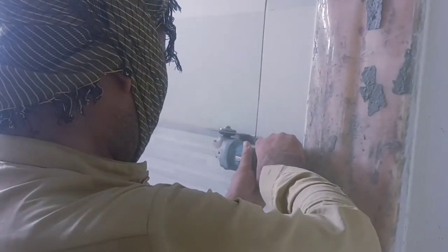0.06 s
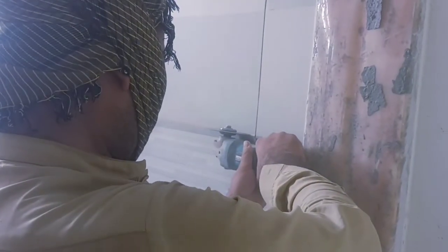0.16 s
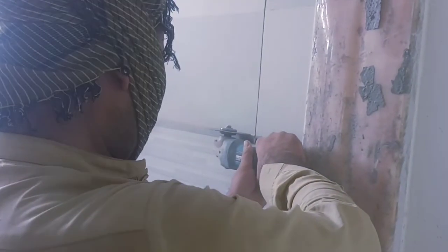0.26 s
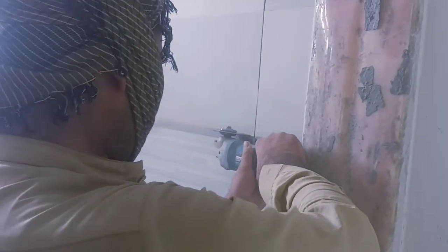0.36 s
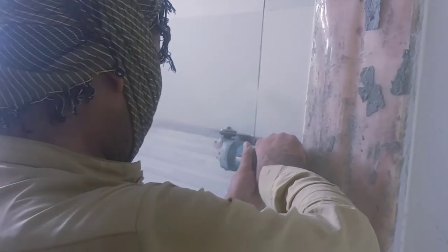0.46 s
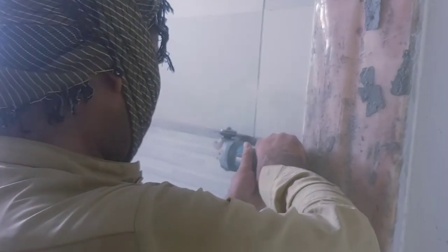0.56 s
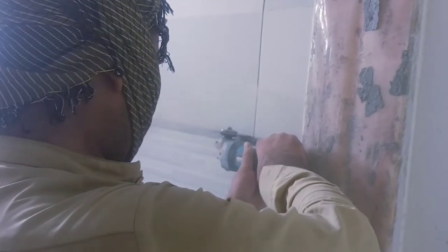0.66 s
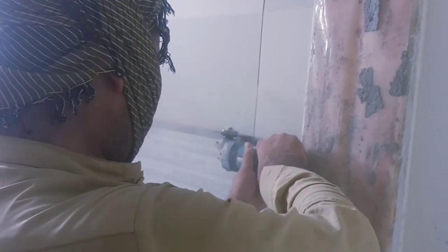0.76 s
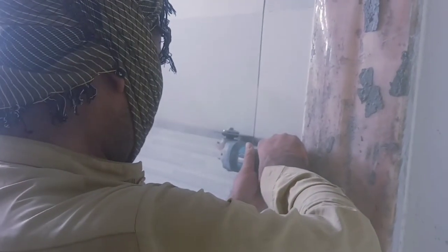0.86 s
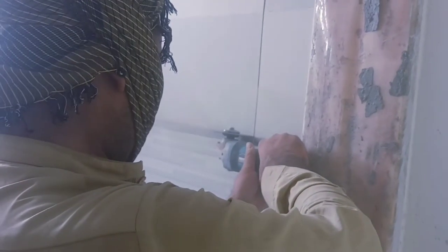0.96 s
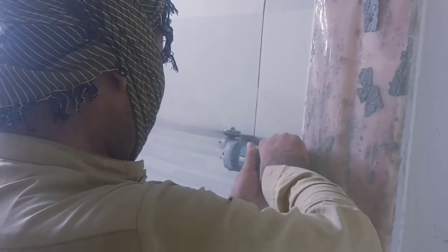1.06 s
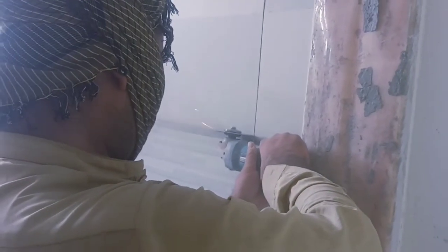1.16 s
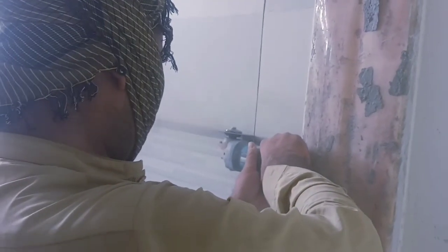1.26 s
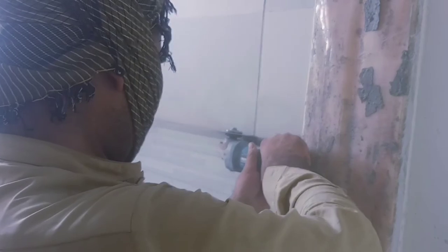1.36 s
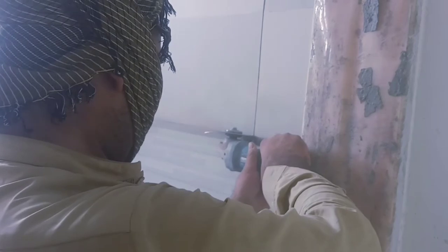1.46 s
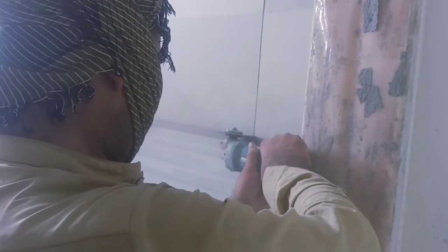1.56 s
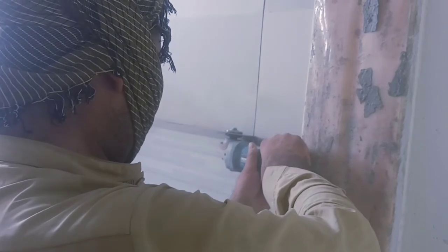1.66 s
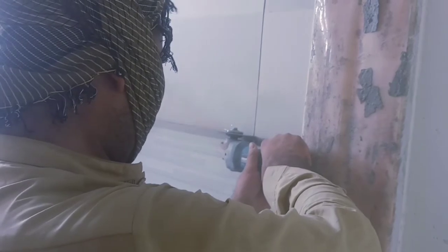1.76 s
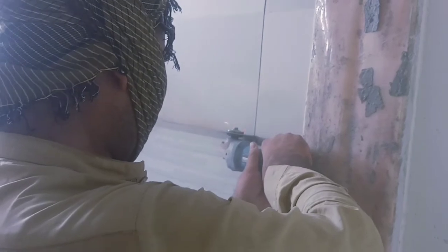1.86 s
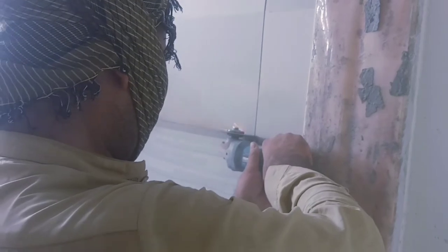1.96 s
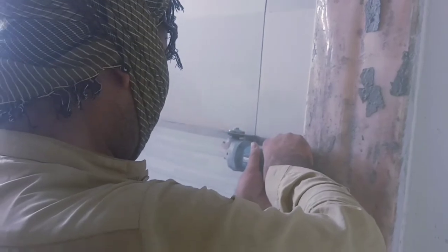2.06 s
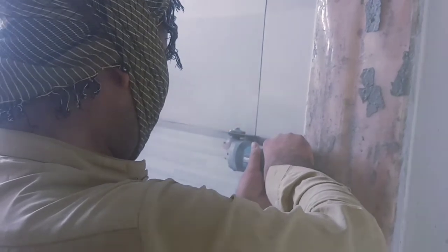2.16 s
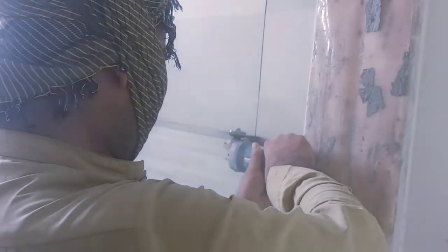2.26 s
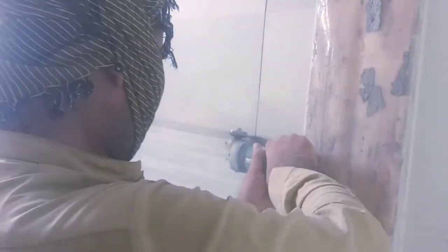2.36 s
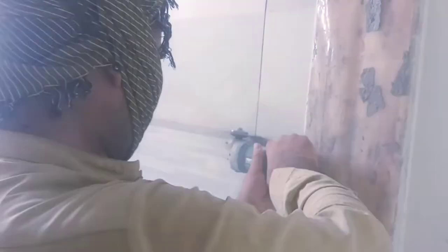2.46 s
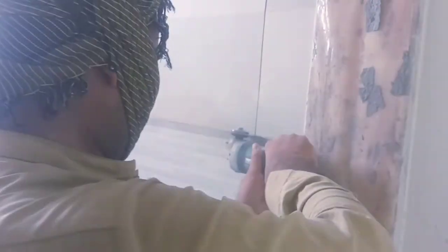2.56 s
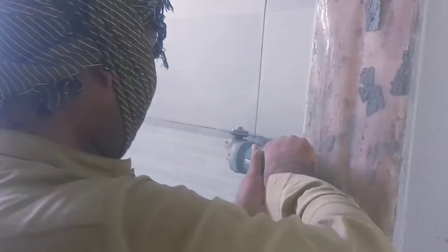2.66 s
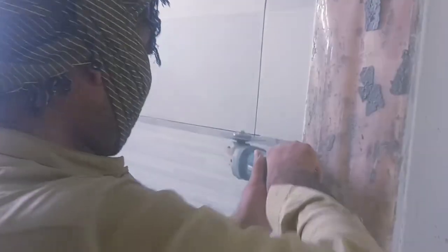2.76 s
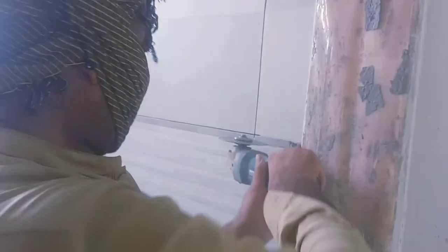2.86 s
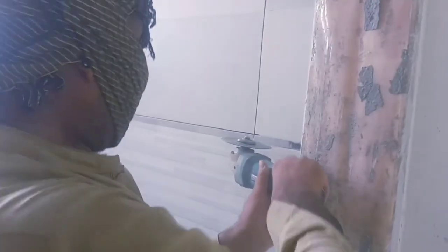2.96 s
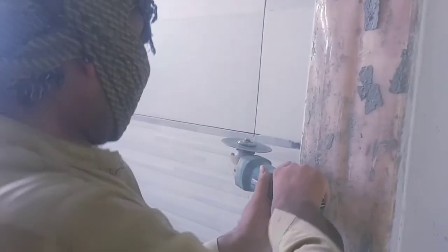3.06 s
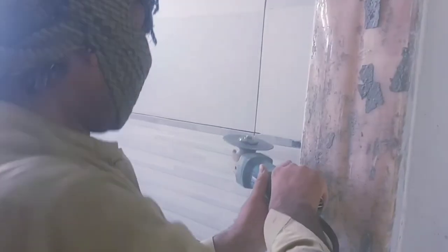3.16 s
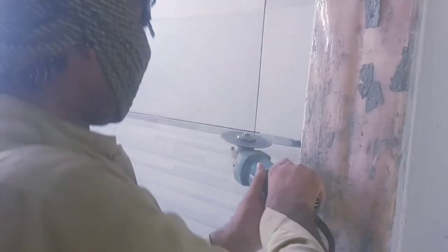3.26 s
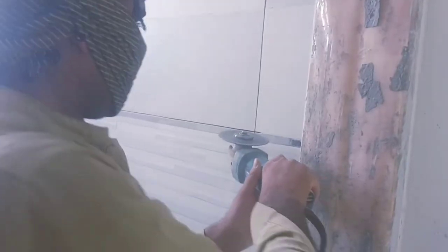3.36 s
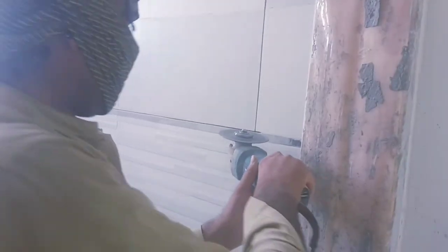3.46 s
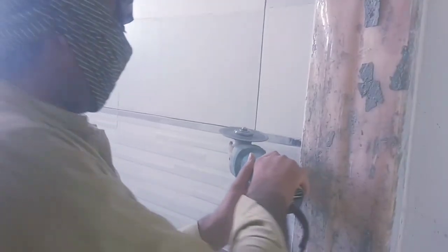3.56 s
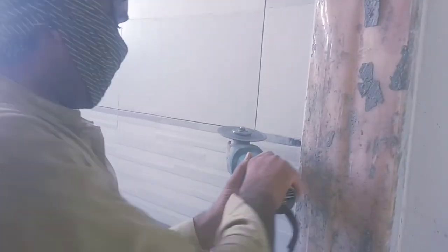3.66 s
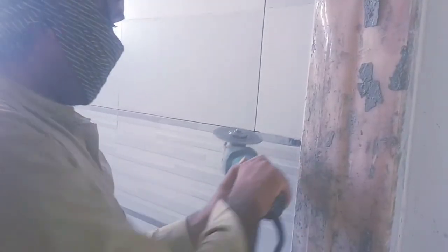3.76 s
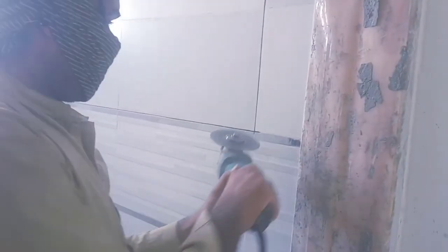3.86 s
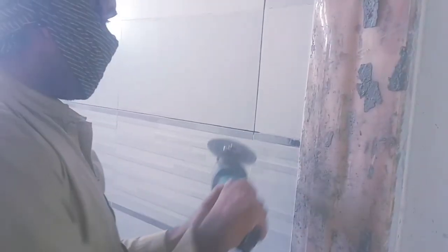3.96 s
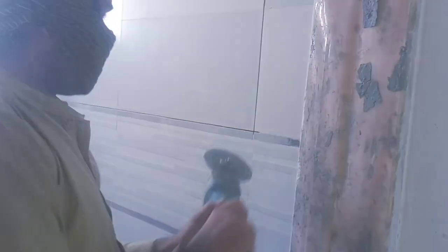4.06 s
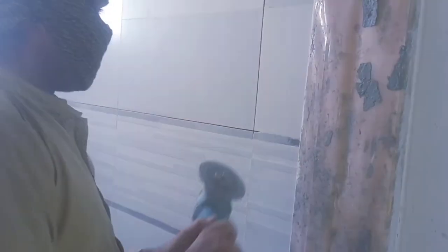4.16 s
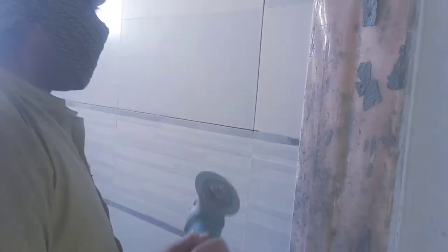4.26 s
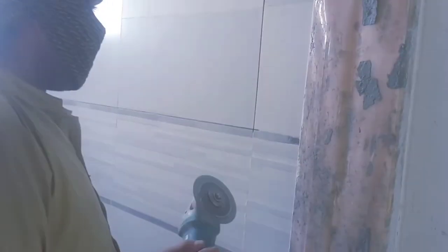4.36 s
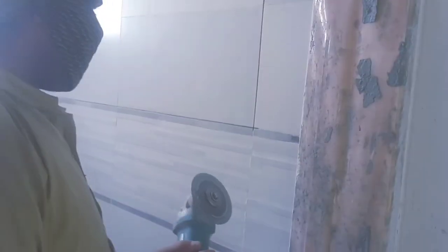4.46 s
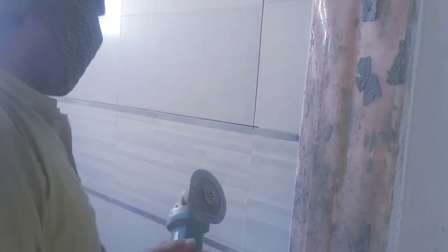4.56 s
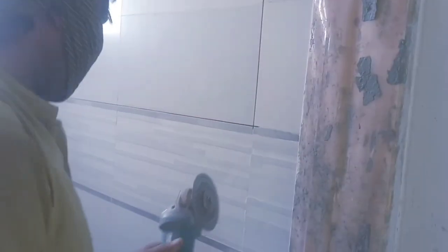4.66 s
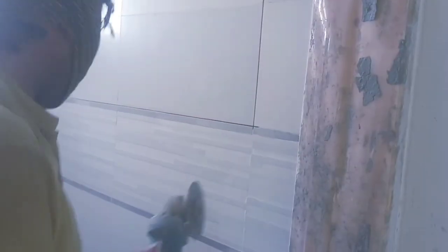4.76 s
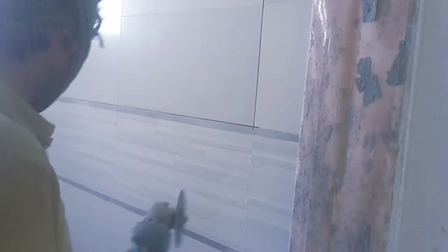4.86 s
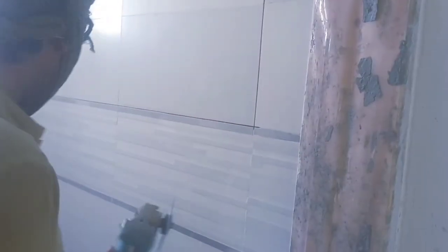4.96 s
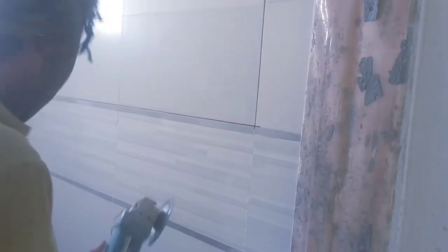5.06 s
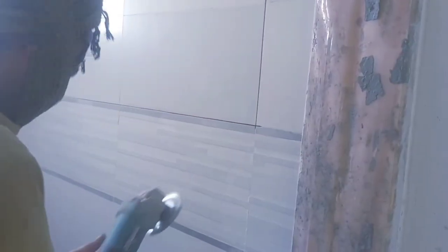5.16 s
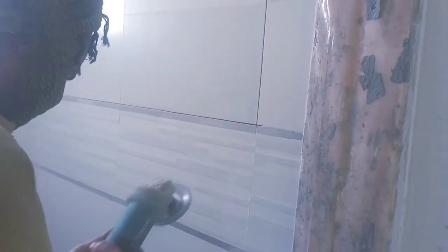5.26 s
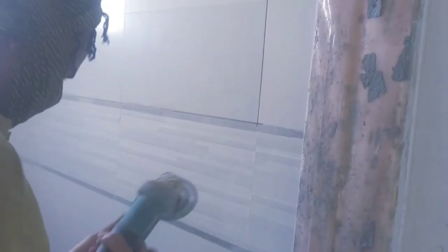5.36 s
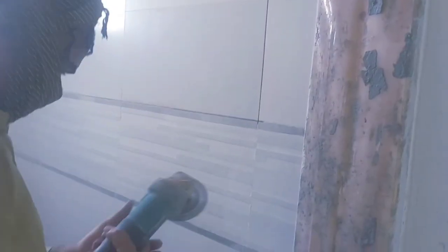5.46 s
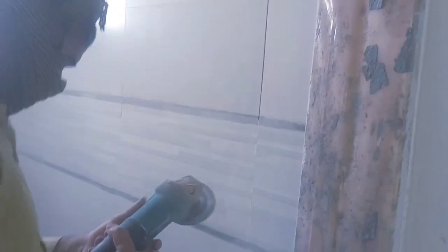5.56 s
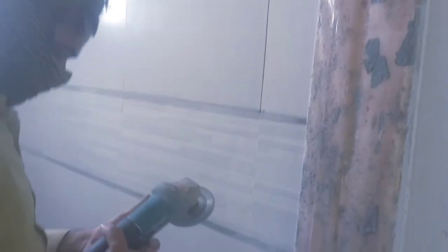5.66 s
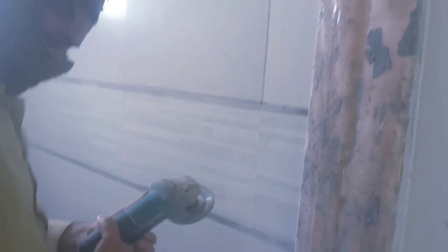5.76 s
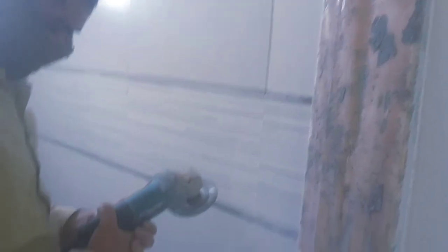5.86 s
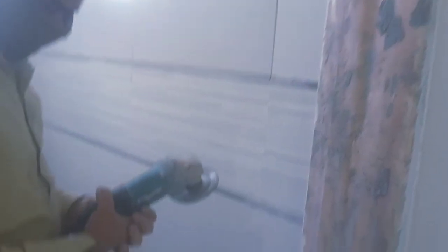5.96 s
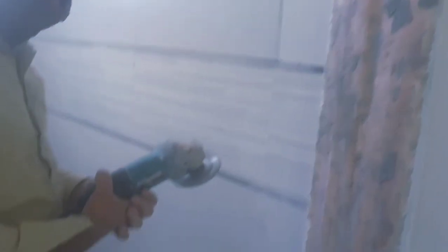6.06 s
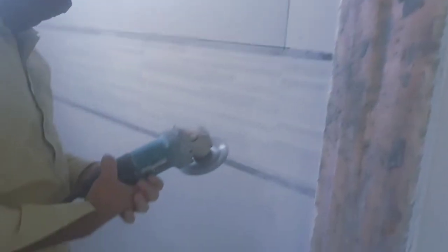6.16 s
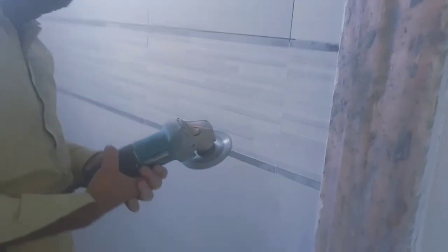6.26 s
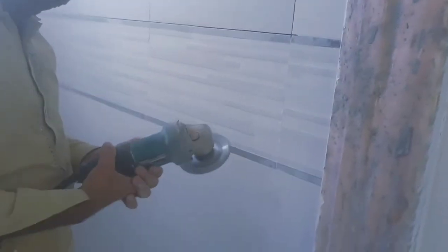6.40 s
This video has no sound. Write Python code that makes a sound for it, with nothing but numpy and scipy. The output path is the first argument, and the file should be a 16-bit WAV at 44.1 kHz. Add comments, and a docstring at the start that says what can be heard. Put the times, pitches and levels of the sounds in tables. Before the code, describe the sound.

Close in a small tiled bathroom, an angle grinder bites into wall tile with a bright, gritty rasp and wavering metallic squeals. Low wind thumps buffet the microphone, mostly on the right. After just over two seconds the rasp stops; the motor rises quickly in pitch, then runs free with a hissing air rush and high whine to the end.

```python
"""An angle grinder cuts wall tiles in a small bathroom: shaped noise is the rasp of its disc, resonators and
wavering tones are the disc's modes. The disc leaves the cut, speeds up with a rising whine and runs free while
the tool turns away from the wall; filtered noise is its air rush and a decaying sweep sets the whine.
Low turbulent noise buffets the microphone ports, mostly the right, and a faint harmonic drone lies beneath.
"""
import sys
import numpy as np
from scipy import signal
from scipy.fft import rfft, irfft, next_fast_len
from scipy.io import wavfile
from scipy.ndimage import uniform_filter1d, map_coordinates

SR = 44100
rng = np.random.default_rng(int(sys.argv[2]) if len(sys.argv) > 2 else 0)


def wav_record(signal):
    """Record a signal, one row per channel, as 16-bit PCM in the file named by sys.argv[1]."""
    frames = np.transpose(np.atleast_2d(signal))
    bounded = np.clip(frames, -1, 1)
    # unit amplitude maps onto the largest positive 16-bit level
    quanta = np.round(bounded * 32767).astype(np.int16)
    wavfile.write(sys.argv[1], SR, quanta)


N = 283563

# Rasp level, following the pressure of the disc in the cut: time_s, rasp_db
CUT_PRESSURE = [(0, -24), (0.1, -22.5), (0.6, -22.5), (1.06, -21.5), (1.9, -23.5), (2.06, -23),
                (2.12, -21.5), (2.32, -21), (2.36, -30), (2.42, -33.5)]
# Relative spectrum of the rasp: frequency_hz, density_db_per_hz
RASP_SPECTRUM = [(290, -42), (500, -15.5), (2080, -7), (2550, -8), (2860, -4), (3120, -4), (4610, -0.5),
                 (5800, -4.5), (6330, -13), (6900, -7), (7310, -15.5), (7740, -6), (10300, 3),
                 (12600, -5.5), (15700, -14)]
# Balance of the rasp between the ports: frequency_hz, left_minus_right_db
RASP_BALANCE = [(60, -5.5), (130, -7.5), (290, -7), (640, 1.5), (1410, 0.5), (3100, -4), (6820, 4.5),
                (15000, -7.5)]
# Disc modes that the grit keeps ringing: frequency_hz, width_hz, relative_level_db
DISC_MODES = [(1780, 63, -18.5), (2140, 42, -12.5), (3446, 79, -7), (3666, 54, -5), (4000, 45, -8.5),
              (4346, 69, -6), (4560, 50, -5), (5920, 80, -13), (7940, 85, -14), (8310, 75, -15),
              (8760, 66, -10), (9300, 80, -11), (10360, 63, -7.5), (10640, 70, -4), (14400, 80, -11),
              (14880, 110, -10), (15520, 100, -8)]
# Loud modes that sing all through the cut, level as at its start:
# first_hz, last_hz, pitch_waver_hz, level_db, left_minus_right_db
SINGING_MODES = [(2960, 2930, 20, -43, -4), (4722, 4722, 14, -44, 0), (5000, 4985, 25, -41, -2),
                 (5560, 5665, 24, -34, -1), (6715, 6755, 30, -39, 4)]
SINGING_FADE_DB = 4.5  # each mode comes and goes by chance
# Tones of the disc and the gears that swell for a moment:
# middle_s, length_s, pitch_hz, louder_port_db, left_minus_right_db
TONE_SWELLS = [(.05, .11, 5560, -27, 0), (.06, .1, 6720, -31, 6), (.1, .08, 2970, -29, -4),
               (.11, .07, 1303, -36, 5), (.21, .13, 5575, -25, -5), (.25, .07, 5016, -25, 1),
               (.32, .11, 4720, -27, 2), (.325, .14, 1344, -27, 6), (.38, .09, 4546, -26, -10),
               (.38, .17, 5000, -22, -8), (.4, .08, 4340, -30, -4), (.5, .12, 5572, -24, 2),
               (.5, .1, 1078, -39, 12), (.53, .12, 3715, -30, -2), (.59, .15, 3633, -27, -10),
               (.6, .15, 4720, -25, -2), (.655, .15, 1082, -27.5, 16), (.77, .13, 5575, -25, -3),
               (.8, .09, 4550, -30, -6), (.78, .06, 6700, -30, -3), (.86, .07, 5640, -28, 5),
               (.97, .1, 6738, -26, 8), (.97, .09, 3421, -30, 5), (1.01, .055, 5573, -21, 1),
               (1.045, .06, 2978, -27, -12), (1.22, .12, 4530, -30, -4), (1.5, .09, 6790, -32, 7),
               (1.56, .13, 5675, -26, -4), (1.85, .1, 5620, -27, 3), (1.91, .07, 2945, -30, -10),
               (2, .09, 3421, -29, 7), (2, .12, 4718, -22, 14), (2.025, .07, 4250, -26, -8),
               (2.035, .09, 5635, -24, -5), (2.05, .15, 6755, -27, -3), (2.055, .09, 2929, -29, -12),
               (2.1, .08, 4590, -30, -12), (2.17, .12, 4730, -22.5, 12), (2.22, .07, 1273, -36, -16),
               (2.225, .11, 5648, -19.5, 9), (2.29, .12, 3476, -29, -10), (2.32, .06, 4908, -30, -8),
               (2.33, .08, 6725, -26, 6), (3.985, .16, 2670, -35, 12), (4.1, .08, 6980, -28, 17),
               (4.175, .14, 3040, -35, -8), (4.22, .16, 1166, -31.5, 13), (4.68, .09, 7068, -29, 17),
               (4.85, .06, 2302, -38, 13), (5.75, .18, 7146, -34, 13), (5.98, .23, 3050, -34.5, -13),
               (6.05, .09, 5030, -33, -16), (6.06, .05, 2476, -37, 16), (6.08, .2, 7150, -35, 10),
               (6.27, .07, 4862, -32, -13), (6.285, .1, 2205, -39, 11), (6.29, .06, 4740, -33, -7)]
SWELL_ROUGH_PER_KHZ = .05  # power share of narrow noise: high swells are rougher
UNALIKE_HZ = 3000  # lower tones reach the two ports more nearly in step

# Air rush of motor and fan: time_s, rush_db
RUSH_LEVEL = [(0, -25), (2.25, -37), (2.33, -48), (2.36, -29), (2.45, -24.5), (2.9, -25), (3.95, -22.5),
              (4.3, -23), (4.8, -23.5), (5.6, -24), (6.43, -24)]
# The tool leaves the wall: time_s, pose (0 to 3, between the four colours below)
TOOL_POSE = [(0, .05), (2.75, 0.077), (3.1, 0.59), (3.45, 0.96), (3.85, 1.8), (4.6, 2.4), (5.3, 2.74),
             (6.43, 2.84)]
# Relative colour of the rush, one list each for the tool in the cut, drawn back, lowered and turned aside:
# frequency_hz, left_db_per_hz, right_db_per_hz
RUSH_COLOURS = [
    [(60, -36, -25), (130, -37, -16), (397, -20, -21), (780, -13.5, -10.5), (1270, -8, -8.5),
     (2270, -8, -12.5), (3420, -8, -2.5), (4700, -3, -1), (5800, -5.5, -7), (7000, -10, -12),
     (8250, -9, -12.5), (11000, -7.5, -4.5), (13300, -20, -14), (15300, -12.5, -11.5)],
    [(60, -22, -22), (130, -26, -22), (400, -17.5, -19.5), (790, -13, -11.5), (1250, -10, -11),
     (2280, -4.5, -5), (3220, -11, -8.5), (4730, -6.5, -2.5), (5750, -2.5, 0.5), (6900, 1.5, -12),
     (8700, -11, -11.5), (10860, -4, 0), (13200, -22, -15), (15200, -14, -13)],
    [(60, -29, -20), (130, -25, -35), (393, -23, -20.5), (770, -11.5, -14), (1300, -8.5, -9),
     (2330, -8, -10), (3360, -10, -9), (5000, -2.5, 0), (5750, 4, -3), (6900, 2.5, -6.5),
     (8240, -11.5, -15.5), (11140, -6.5, -1), (13300, -34, -18), (14700, -14, -15)],
    [(60, -26, -27), (130, -27, -23.5), (405, -24.5, -26.5), (755, -15.5, -13.5), (1250, -10.5, -11),
     (2320, -5, -9.5), (3150, -11.5, -8.5), (4630, -8.5, -6), (5430, -3, 1.5), (7130, -1, -15),
     (8450, -10.5, -18), (10760, -3.5, 3), (12650, -18, -10), (14200, -14, -11.5)],
]
# Freed from the cut, the motor runs up fast, then creeps to full speed: mesh_still_to_gain_hz, time_constant_s
RUN_UP_STAGES = [(1400, .54), (518, 1.25)]
FREE_S, FULL_MESH_HZ = 2.37, 7175
# The housing favours some pitches of the gear mesh: mesh_hz, level_db
HOUSING_GAIN = [(5385, -62), (6040, -54), (6250, -44), (6700, -40), (6870, -45.5), (7000, -49), (7170, -51)]
HIGH_ORDER = 2.6  # pitch of the high whine over the gear mesh
HIGH_DB, WHINE_RISE_S = -36.5, .13

# Steady draught, weaker late in the cut: time_s, right_port_db
STEADY_DRAUGHT = [(0, -43), (1.2, -38.5), (1.5, -45.5), (2.15, -50)]
BREEZE_LEFT_DB = -10  # left port relative to the right
# Gusts: middle_s, length_s, right_port_db, left_minus_right_db
GUST_EVENTS = [(0, 0.048, -39, -19), (.06, 0.084, -39, 5.5), (0.237, 0.056, -25.5, -14),
               (0.295, 0.089, -41, -2), (0.534, 0.036, -30, -22), (0.612, 0.046, -35.5, -4),
               (0.728, 0.031, -33, -24), (0.804, 0.045, -27, -10), (0.884, 0.085, -39, -20),
               (0.98, 0.058, -38, -22), (1.132, 0.079, -33, -28), (1.277, 0.043, -46, -20),
               (1.604, 0.04, -39, -22), (2.205, 0.041, -19, -26), (2.258, 0.029, -21.5, -24),
               (2.294, 0.033, -20.5, -45)]
# Relative spectrum of the turbulence: frequency_hz, density_db_per_hz
TURBULENCE = [(15, -50), (30, -12), (80, 2.5), (150, 2), (400, -2), (650, -11), (1300, -12.5), (3000, -58),
              (6000, -120)]
CALM_S = 2.33  # the disc points away

# Faint steady drone, perhaps a fan nearby: multiple_of_shaft_rate, level_db
DRONE_HARMONICS = [(4, -66), (5, -71), (7, -82), (8, -74), (10, -66.5), (11, -72), (12, -76), (14, -77),
                   (15, -70.5), (26, -62), (28, -64)]
DRONE_HZ = 30.66  # turns a second

# Likeness of the two ports: frequency_hz, correlation (0 to 1)
PORT_LIKENESS = [(60, 0.88), (180, 0.98), (550, 0.6), (1650, 0.066), (5000, 0.094), (15000, 0.098)]
# Fixed narrow dips in the colour of the whole sound, and a low edge near 40 Hz: centre_hz, width_hz, gain_db
COLOUR_DIPS = [(40, 41, -3.5), (980, 104, -3), (2495, 64, -2.5), (3250, 35, -1.5), (5470, 97, -0.5),
               (13900, 250, -1)]
TOP_HZ = 15750


def cutting():
    """Friction and resonance: grit rasps on the tile and the disc rings in modes that fade in and out."""
    rasp_db, = curves(CUT_PRESSURE)
    t = np.arange(N) / SR
    end_s = CUT_PRESSURE[-1][0]

    grit = ports(patchy(3.6, 2.5, 6.5, size=1024), lag_s=0.000186)
    rasp = unit(filtered(grit, lambda hz: sides(along(RASP_SPECTRUM, hz), along(RASP_BALANCE, hz))))
    ring = unit(filtered(patchy(3.9, 2.5, 5.5, size=1024), disc_resonance))
    chatter = amp(0.42 * wobble(29.15)[0])  # the disc bites unevenly
    out = amp(rasp_db) * chatter * (rasp + amp(-3.0) * ring)

    depth = np.clip(t / end_s, 0, 1)
    for first_hz, last_hz, waver_hz, db, pan_db in SINGING_MODES:
        hz = first_hz + (last_hz - first_hz) * depth
        level_db = db + rasp_db - CUT_PRESSURE[0][1] + SINGING_FADE_DB * wobble(14)
        pan = np.array([[pan_db], [-pan_db]]) / 2
        level = amp(level_db + pan + 2.5 * wobble(45))
        out += level * tone(hz, waver_hz, rate=110, rough=.6)

    room_decay = amp(-60 * np.clip(t - end_s, 0, None) / 0.22)  # 60 dB in 0.22 s
    return out * room_decay


def disc_resonance(hz):
    """Modal superposition: second-order resonances add with alternating sign."""
    total = 0
    for k, (centre_hz, width_hz, db) in enumerate(DISC_MODES):
        damping = 1j * hz * width_hz
        total = total + (-1) ** k * amp(db) * damping / (centre_hz ** 2 - hz ** 2 + damping)
    return total


def swells():
    """Modulated oscillation: short, slightly unsteady tones under a smooth rise and fall."""
    t, out = np.arange(N) / SR, np.zeros((2, N))
    drift_s = .00004 * wobble(70)  # wavering delay
    flutter = amp(1.5 * wobble(40))
    fuzz = wobble(90) + 1j * wobble(90)
    turns = rng.random((len(TONE_SWELLS), 2, 1))  # starting phase at each port, in cycles
    for (middle_s, length_s, hz, db, pan_db), turn in zip(TONE_SWELLS, turns):
        span, shape = bump(middle_s, length_s, edge=2.6)
        rough = SWELL_ROUGH_PER_KHZ * hz / 1000
        carrier = np.sqrt(rough) * fuzz[:, span] + np.sqrt(2 - 2 * rough)
        body = shape * flutter[:, span] * carrier
        gains = sides(db - abs(pan_db) / 2, pan_db)[:, None]
        turn = turn[0] + (turn - turn[0]) * min(hz / UNALIKE_HZ, 1)
        cycles = hz * (t[span] + drift_s[:, span]) + turn
        out[:, span] += np.imag(gains * body * np.exp(2j * np.pi * cycles))
    return out


def motor():
    """Flow noise and rotation: the air rush changes colour with the pose; gears and armature whine with speed."""
    rush_db, = curves(RUSH_LEVEL)
    rush = amp(rush_db + 0.13 * wobble(14)) * air_rush()
    free_s = np.clip(np.arange(N) / SR - FREE_S, 0, None)
    mesh_hz = FULL_MESH_HZ - sum(gain_hz * np.exp(-free_s / slow_s) for gain_hz, slow_s in RUN_UP_STAGES)
    gear_level = sides(along(HOUSING_GAIN, mesh_hz) + 4 * wobble(9)[0], 5.5)
    gear = gear_level * tone(mesh_hz, 27, rate=75, rough=0.64)
    high_level = amp(HIGH_DB + 1.5 * wobble(30))
    high = high_level * tone(HIGH_ORDER * mesh_hz, 30, rate=60, rough=.2, turn=.3)
    return rush + np.clip(free_s / WHINE_RISE_S, 0, 1) * (gear + high)


def air_rush():
    """Spectral interpolation: one turbulent noise, cross-faded between the colours of neighbouring poses."""
    pose_now, = curves(TOOL_POSE)
    # the rush is uneven: long, narrow patches of random gain
    air = ports(patchy(3.64, 2.5, 7.5, size=1024), lag_s=.00006)
    rush = 0
    for pose, colour in enumerate(RUSH_COLOURS):
        share = np.clip(1 - np.abs(pose_now - pose), 0, 1)
        at_hz, left, right = np.transpose([(17, -50, -50)] + list(colour))
        both = lambda hz: amp([np.interp(np.log(hz + 1), np.log(at_hz), db) for db in (left, right)])
        rush = rush + share * unit(filtered(air, both))
    return rush


def draught():
    """Turbulence: lumpy low noise, unrelated at the two ports, stops when the disc points away."""
    strength = amp(curves(STEADY_DRAUGHT) + [[BREEZE_LEFT_DB], [0]] + 0.83 * wobble(10))
    for middle_s, length_s, db, pan_db in GUST_EVENTS:
        span, shape = bump(middle_s, length_s, edge=1.9)
        strength[:, span] += amp([[db + pan_db], [db]]) * shape
    lumps = amp(3.4 * wobble(90))
    eddies = filtered(lumps * rng.standard_normal((2, N)), lambda hz: amp(along(TURBULENCE, hz)))
    power = np.abs(uniform_filter1d(eddies ** 2, size=1800))
    eddies = eddies / np.sqrt(power + 1e-9)  # even strength over about 40 ms
    calming = amp(-60 * np.clip(np.arange(N) / SR - CALM_S, 0, None) / .04)  # 60 dB in 0.04 s
    return strength * eddies * calming


def drone():
    """Harmonic series: multiples of one slow shaft, each a little unsteady, alike at both ports."""
    t, out = np.arange(N) / SR, 0
    for multiple, db in DRONE_HARMONICS:
        level = amp(db + 4.1 * wobble(7)[0])
        phase = 2 * np.pi * multiple * DRONE_HZ * t + wobble(7)[0]
        out = out + level * np.sqrt(2) * np.sin(phase)
    return out


def ports(pair, lag_s):
    """Partial coherence: some noise reaches both ports, the left lag_s later; the rest comes off the tiles."""
    def mix(hz):
        alike = along(PORT_LIKENESS, hz)
        return np.array([alike, np.sqrt(1 - alike ** 2)])

    left = filtered(pair[0], lambda hz: np.exp(-2j * np.pi * hz * lag_s))
    right = filtered(pair, mix).sum(0)
    return np.array([left, right])


def tone(hz, blur_hz, rate, rough, turn=1.47):
    """Phase modulation: a wavering tone mixed with narrow noise; moving reflections turn its phase at each port."""
    phase = 2 * np.pi * np.cumsum(hz + blur_hz * wobble(rate)[0]) / SR + turn * wobble(6)
    fuzz = wobble(rate) * np.sin(phase) + wobble(rate) * np.cos(phase)
    return np.sqrt(2 - 2 * rough) * np.sin(phase) + np.sqrt(rough) * fuzz


def patchy(depth_db, bins, frames, size=256):
    """Time-frequency modulation: two unrelated noises with patches of random gain."""
    z = signal.stft(rng.standard_normal((2, N)), nperseg=size)[2]
    field = uniform_filter1d(rng.standard_normal(z.shape), int(bins), 1)
    field = uniform_filter1d(field, int(frames), 2)
    return signal.istft(z * amp(depth_db * unit(field)), nperseg=size)[1][:, :N]


def wobble(rate):
    """Band-limited fluctuation: smooth random curves for the two ports, rate knots a second."""
    knots = rng.standard_normal((2, int(N * rate / SR) + 4))
    at = np.arange(N // 32 + 2) * 32 * rate / SR  # spline every 32 samples, straight lines between
    steps = np.array([map_coordinates(k, [at]) for k in knots])
    between = steps[:, :-1, None] + np.diff(steps)[:, :, None] * np.arange(32) / 32
    return between.reshape(2, -1)[:, :N]


def bump(middle_s, length_s, edge):
    """Smooth envelope: a rise and fall, length_s wide at 1/e, and the samples it spans."""
    first = max(0, round((middle_s - length_s) * SR))
    last = min(N, round((middle_s + length_s) * SR))
    offset_s = np.arange(first, last) / SR - middle_s
    return slice(first, last), np.exp(-np.abs(2 * offset_s / length_s) ** edge)


def filtered(x, response):
    """Linear filtering: the spectrum of x times a complex response of frequency."""
    m = next_fast_len(N + 8192)
    return irfft(rfft(x, m) * response(np.fft.rfftfreq(m, 1 / SR)), m)[..., :N]


def along(points, hz):
    """Logarithmic frequency scale: interpolates (Hz, value) points on a log axis."""
    f, v = np.transpose(points)
    return np.interp(np.log(hz + 1), np.log(f + 1), v)


def curves(rows):
    """Linear interpolation in time: one value per sample for each column after the time."""
    s, *cols = np.transpose(rows)
    return np.array([np.interp(np.arange(N) / SR, s, c) for c in cols])


def sides(db, pan_db):
    """Level difference: gains of the left and right port, pan_db apart."""
    return amp(np.array([db + pan_db / 2, db - pan_db / 2]))


def amp(db):
    """Decibel scale: the amplitude ratio of a level."""
    return np.exp(np.asarray(db) * (np.log(10) / 20))


def unit(x):
    """Normalisation: scales x to a root mean square of one."""
    return x / np.sqrt(np.mean(x ** 2) + 1e-20)


def scene():
    """Superposition: the pressures of all sources add."""
    return cutting() + swells() + motor() + draught() + drone()


def record(dry):
    """Linear filtering and band limit: narrow dips colour everything and nothing passes from TOP_HZ upwards."""
    def colour(hz):
        dips_db = sum(db * np.exp(-((hz - centre_hz) / width_hz) ** 2) for centre_hz, width_hz, db in COLOUR_DIPS)
        return amp(dips_db) * (hz < TOP_HZ)

    return filtered(dry, colour)


dry = scene()
out = record(dry)
wav_record(out)
```